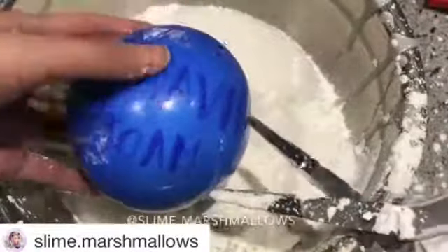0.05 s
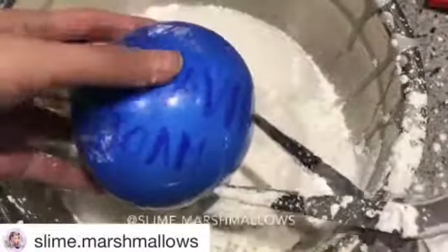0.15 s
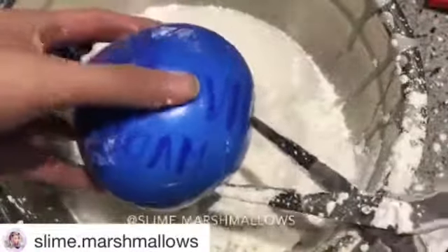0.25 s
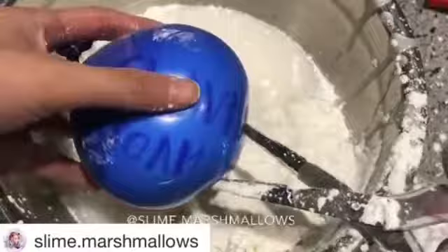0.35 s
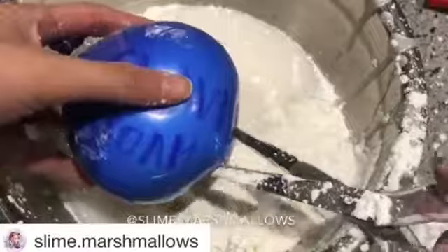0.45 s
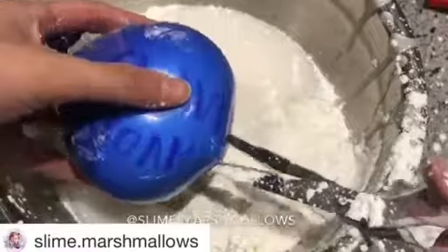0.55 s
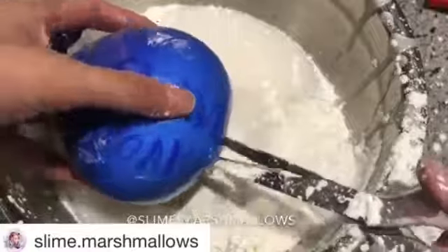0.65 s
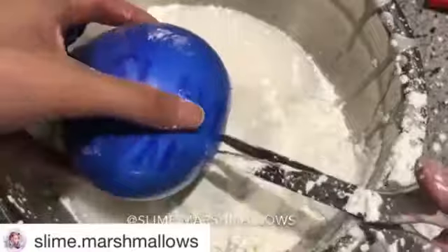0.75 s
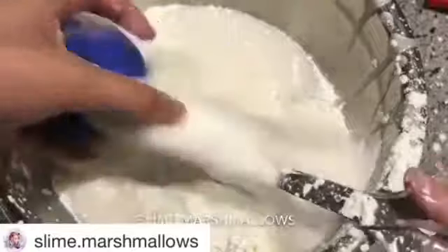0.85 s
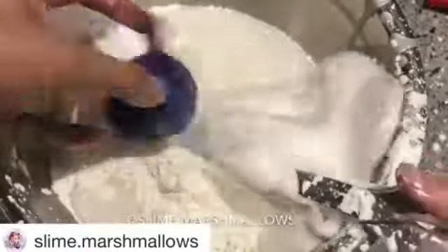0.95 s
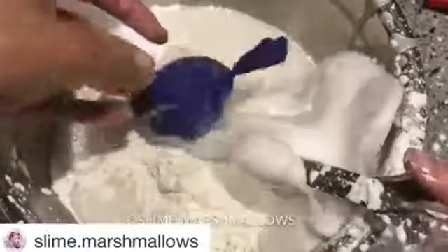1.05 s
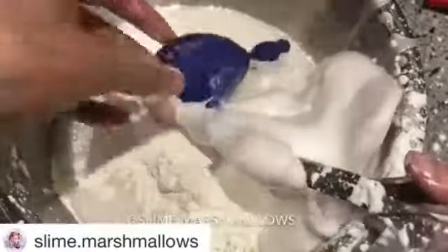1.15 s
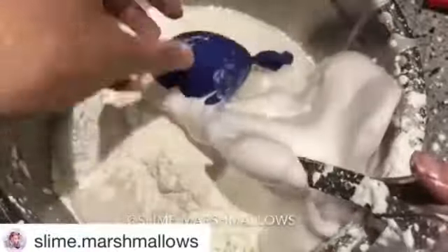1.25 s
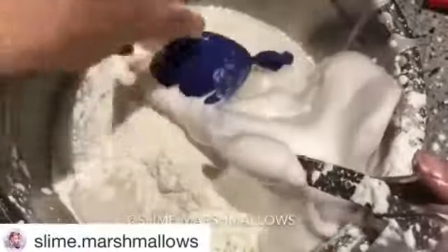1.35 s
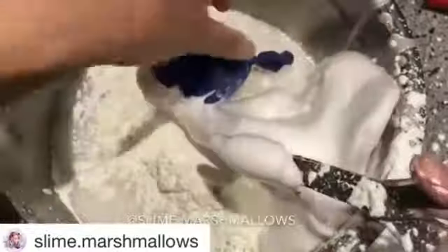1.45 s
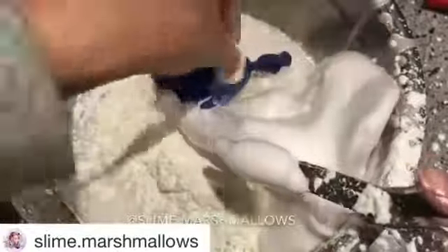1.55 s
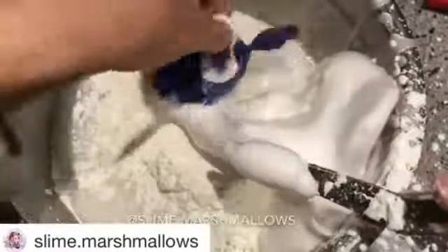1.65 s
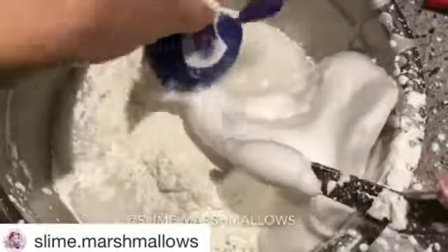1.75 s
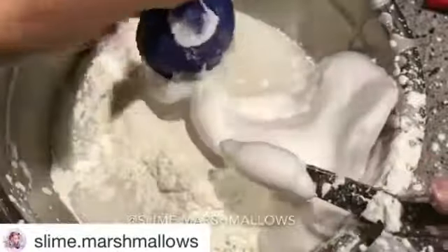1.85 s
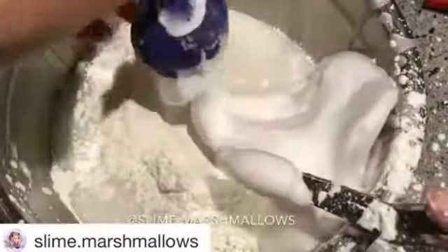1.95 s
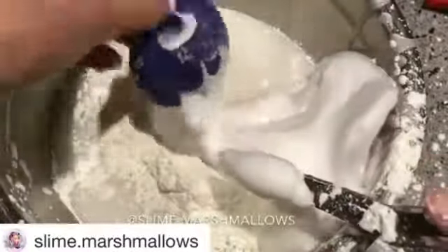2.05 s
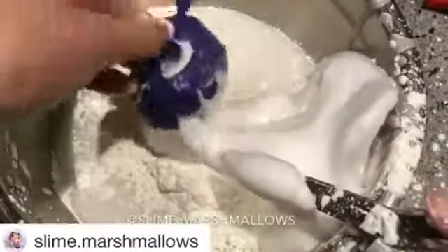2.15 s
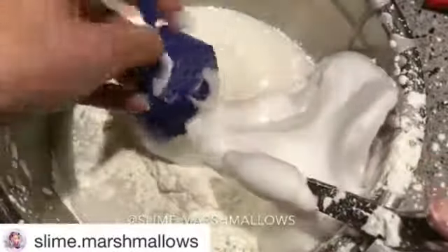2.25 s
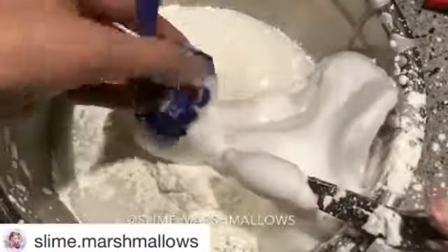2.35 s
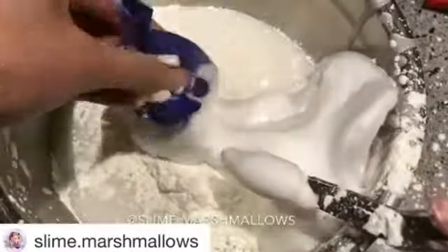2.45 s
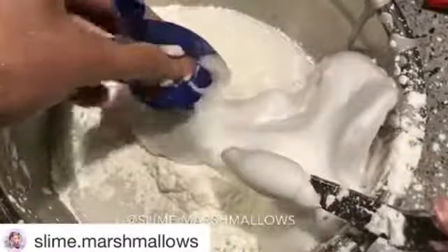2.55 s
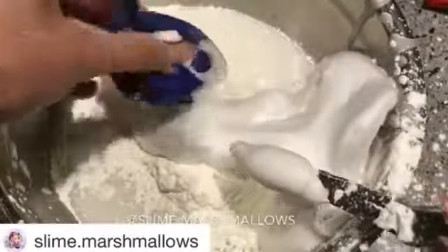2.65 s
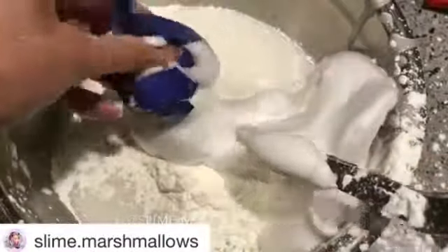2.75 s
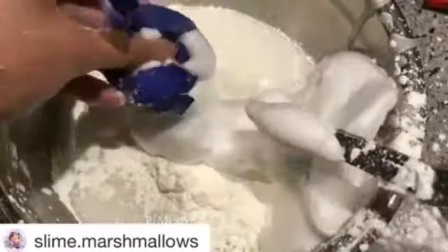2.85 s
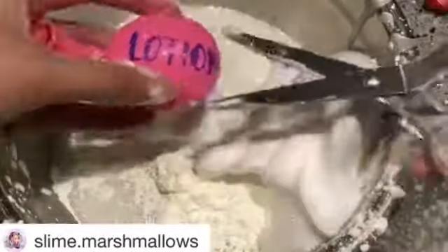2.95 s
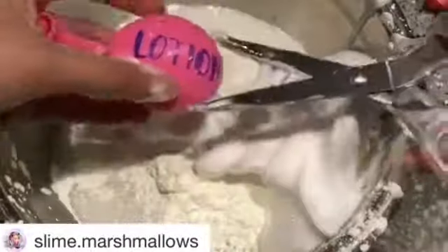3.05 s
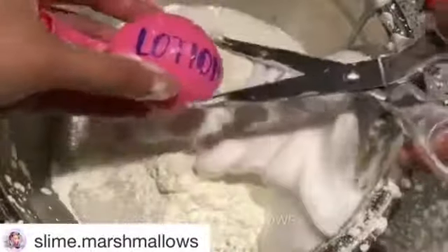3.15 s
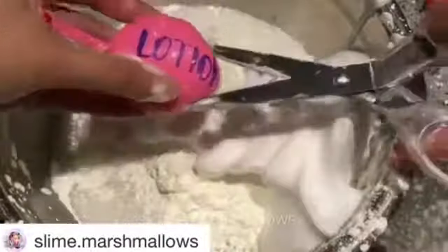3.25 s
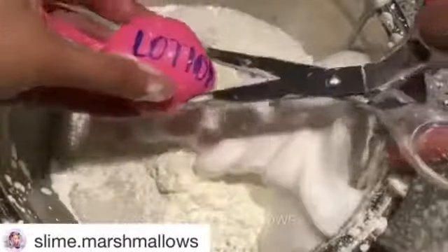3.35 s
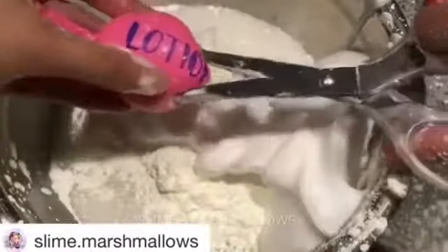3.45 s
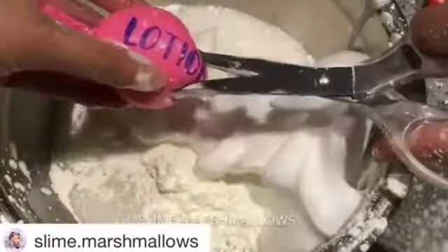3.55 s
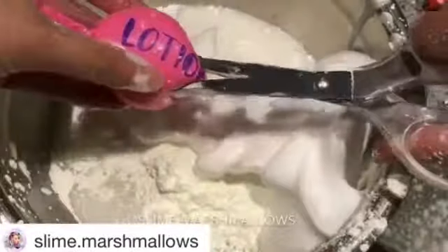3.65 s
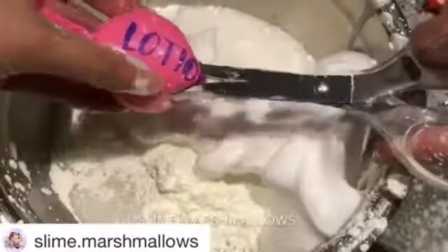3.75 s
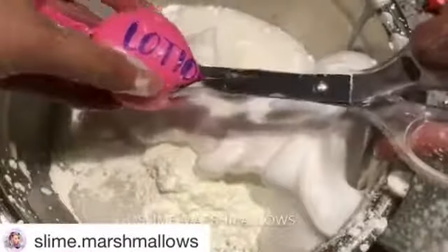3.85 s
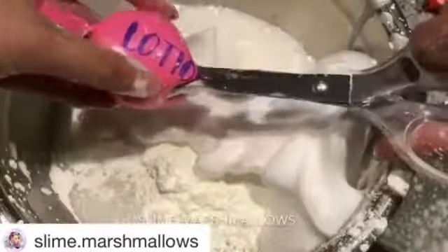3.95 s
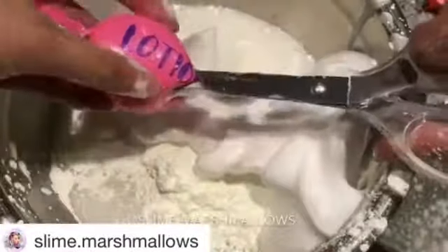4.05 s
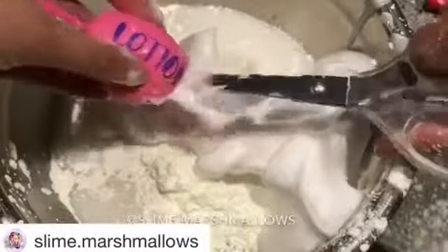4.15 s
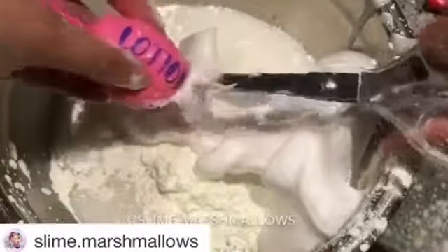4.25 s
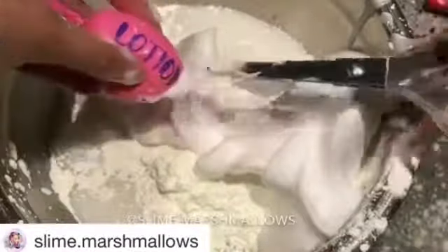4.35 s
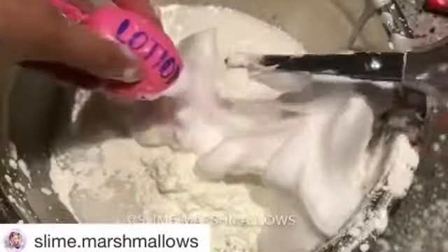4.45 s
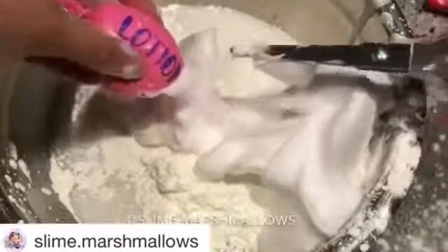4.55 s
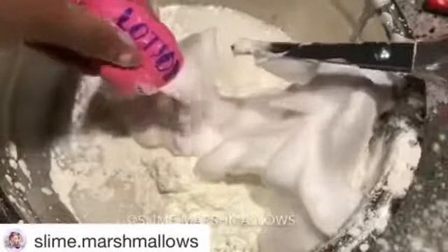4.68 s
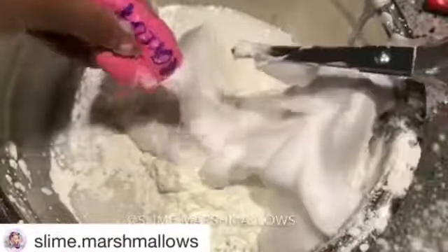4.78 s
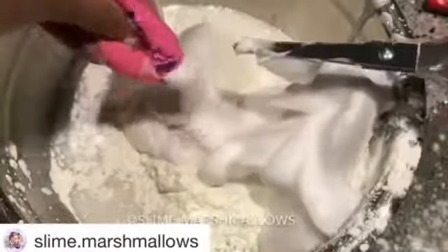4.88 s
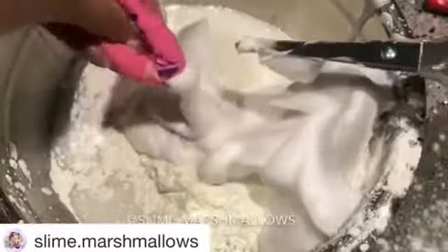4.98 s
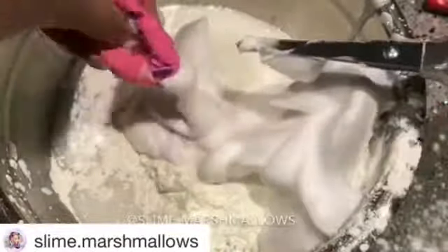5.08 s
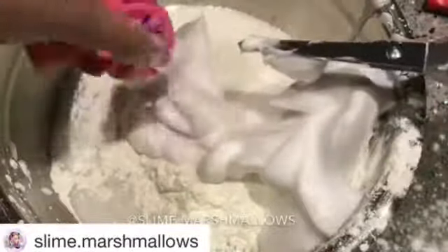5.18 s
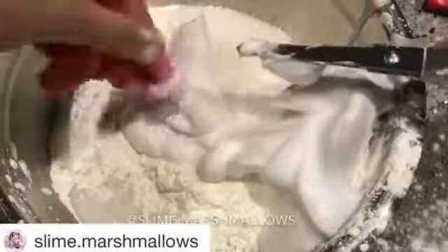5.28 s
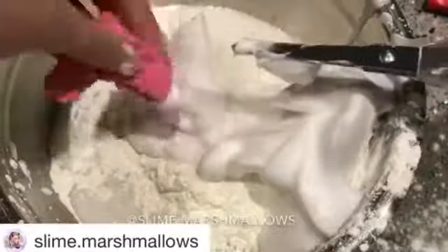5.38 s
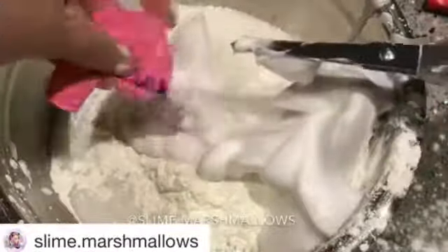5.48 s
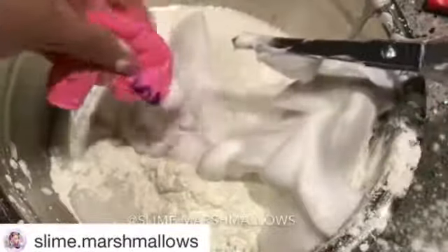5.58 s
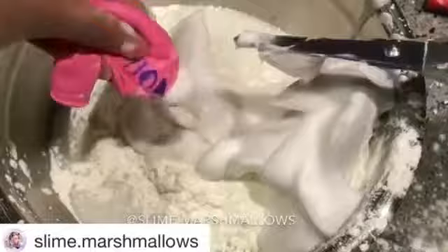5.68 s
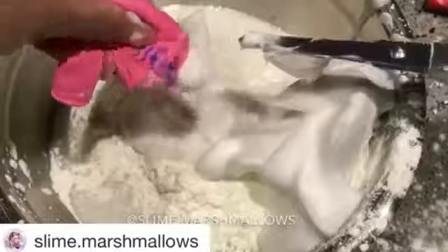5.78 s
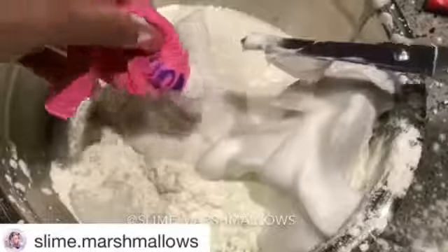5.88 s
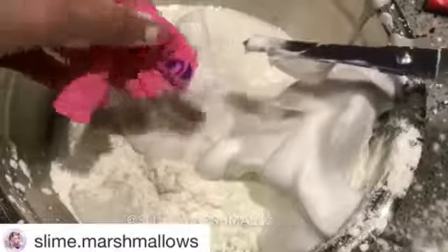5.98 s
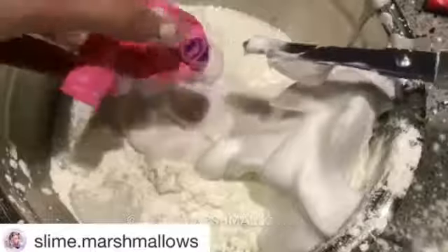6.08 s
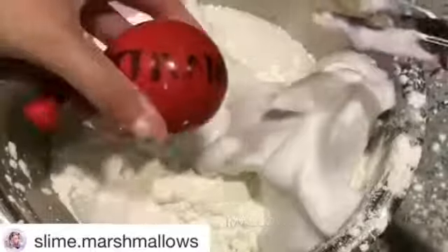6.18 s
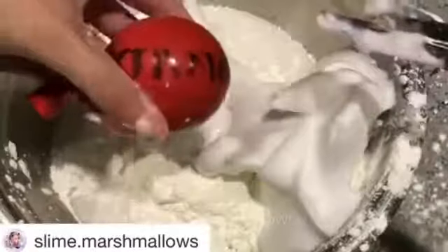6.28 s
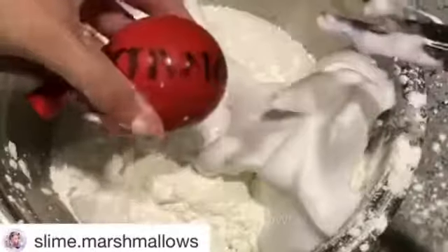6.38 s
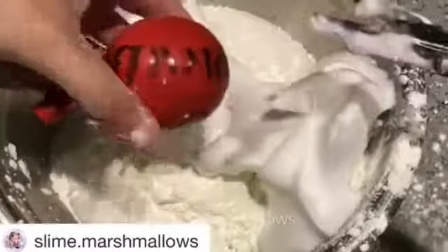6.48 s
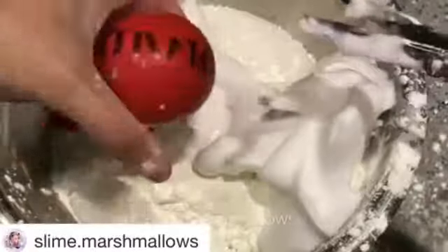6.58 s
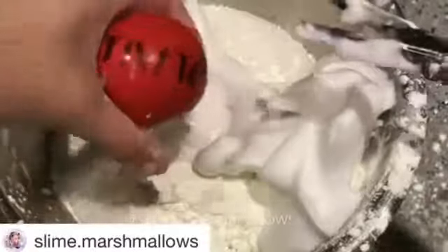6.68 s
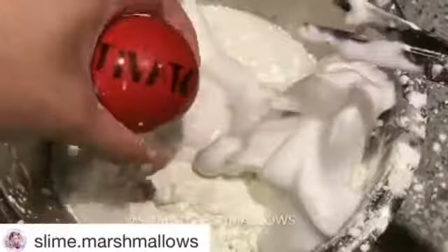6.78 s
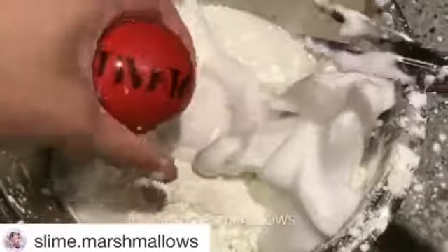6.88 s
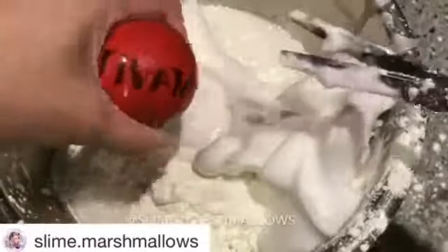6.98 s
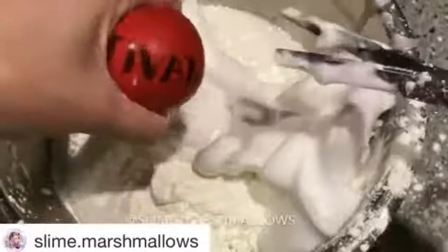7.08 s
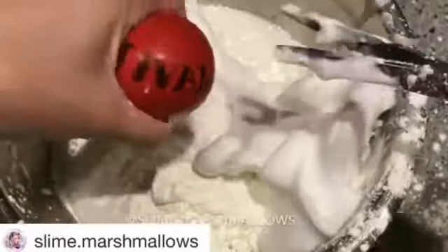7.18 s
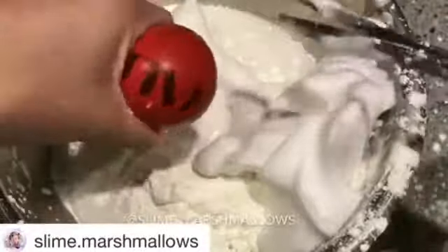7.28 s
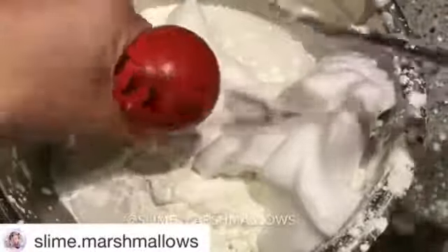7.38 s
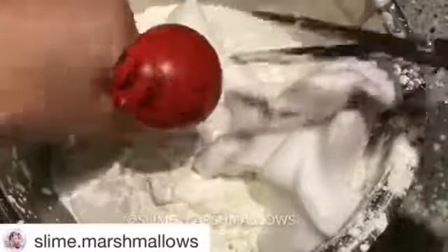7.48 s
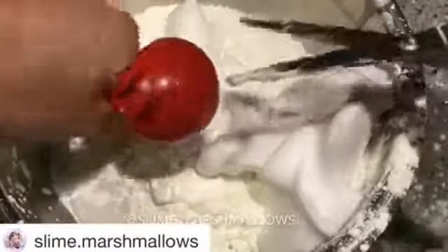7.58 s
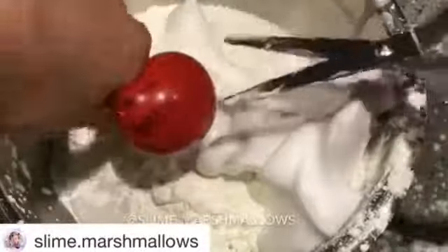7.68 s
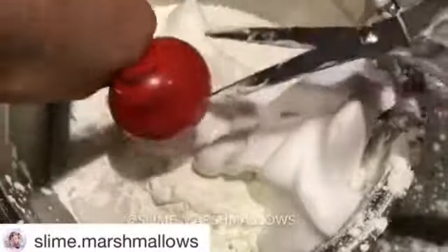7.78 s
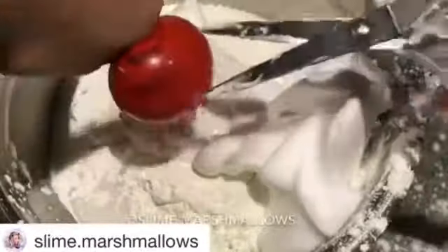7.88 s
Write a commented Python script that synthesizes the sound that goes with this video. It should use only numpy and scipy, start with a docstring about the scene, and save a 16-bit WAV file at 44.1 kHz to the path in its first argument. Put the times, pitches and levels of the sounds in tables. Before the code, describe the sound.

Close-up handling of rubber and fizzing foam over a steady hum, broken by two loud balloon bursts that ring a metal bowl in a small room.

```python
"""A small room, phone microphone close to a steel bowl over which two filled balloons are cut with scissors.
An appliance hums steadily: one wavering tone over filtered noise. Fingers rub rubber and crackle foam in
strokes of noise and tiny pings, with separate clicks and plucks. A noisy hiss and whistle swell before each pop,
plainest before the second. Each skin bursts in quick snaps, each a pressure pulse, a crack and a flutter, that ring
the bowl's decaying tones and the room's echoes; a soft hiss hangs on after."""
import sys
import numpy as np
from scipy import signal
from scipy.fft import rfft, irfft, next_fast_len
from scipy.io import wavfile
from scipy.ndimage import uniform_filter1d

SR = 44100
rng = np.random.default_rng(int(sys.argv[2]) if len(sys.argv) > 2 else 0)


def bounce(signal):
    """Save signal as a 16-bit WAV file at the path given by the first command-line argument."""
    frames = np.transpose(np.atleast_2d(signal))
    limited = np.clip(frames, -1, 1)
    pcm = np.round(limited * 32767).astype(np.int16)
    wavfile.write(sys.argv[1], SR, pcm)


N = 349713  # length in samples


def undb(db):
    """Decibels to amplitude gain."""
    return 10 ** (np.asarray(db) / 20)


def level(x, db):
    """Scale to an rms level in dB."""
    return x * undb(db) / np.sqrt(np.mean(x ** 2))


def fade(t, t60):
    """Exponential decay by 60 dB in t60 seconds."""
    return np.exp(-np.log(1000) * t / t60)


def along(points, hz):
    """Read (Hz, value) points on a log-frequency axis."""
    point_hz, value = np.transpose(points)
    return np.interp(np.log(np.maximum(hz, 1)), np.log(point_hz), value)


def colour(x, points):
    """Causal minimum-phase filter with the given spectrum shape, scaled to unit power gain."""
    size = next_fast_len(2 * len(x), True)
    size += size % 2
    gain = undb(along(points, np.arange(size // 2 + 1) * SR / size))
    # folding the cepstrum onto positive time makes the filter causal
    cepstrum = irfft(np.log(level(gain, 0)))
    cepstrum[1:size // 2] *= 2
    cepstrum[size // 2 + 1:] = 0
    response = np.exp(rfft(cepstrum))
    return irfft(rfft(x, size) * response)[:len(x)]


def band(x, low_hz, high_hz):
    """Band-pass filter, its upper edge kept below half the sample rate."""
    edges = [low_hz, min(high_hz, .47 * SR)]
    return signal.sosfilt(signal.butter(2, edges, "bandpass", fs=SR, output="sos"), x)


def walk(rate):
    """Slow chance: random levels, `rate` per second, slewed; rms 1."""
    hold = int(SR / rate)
    steps = np.repeat(rng.standard_normal(N // hold + 1), hold)
    return level(uniform_filter1d(steps, hold)[:N], 0)


def add(track, s, x):
    """Mix a sound in at time s."""
    i = int(s * SR)
    track[i:i + len(x)] += x[:N - i]


def even_noise(t):
    """Noise with the same energy at every frequency."""
    phases = 2 * np.pi * rng.random(len(t) // 2 + 1)
    return level(irfft(np.exp(1j * phases), len(t)), 0)


def burst(shape, count=6):
    """Noise under an envelope whose spectrum stays smooth, like one short impact."""
    x = rng.standard_normal(len(shape)) * shape
    # alternately flatten the spectrum and press the envelope back on
    for _ in range(count):
        flat = irfft(np.exp(1j * np.angle(rfft(x))), len(x))
        x = flat * np.sqrt(shape / shape.max())
    return level(x, 0) * np.sqrt(np.mean(shape ** 2))


def grains(rate, low_hz, high_hz, t60, spread_db):
    """Tiny bubbles and slips at random moments, each ringing briefly at its own pitch."""
    t = np.arange(SR // 50) / SR
    out = np.zeros(N)
    for when, pitch, size in rng.random((int(rate * N / SR), 3)):
        hz = low_hz * (high_hz / low_hz) ** pitch
        db = spread_db * min(-np.log(1 - size), 3)  # most are small, a few stand out
        ping = np.sin(2 * np.pi * hz * t) * fade(t, t60)
        add(out, when * N / SR, undb(db) * ping)
    return out


def swell(start_s, length_s, attack_s, sag_db_per_s, release_t60):
    """Envelope that rises, holds with a slight sag and is released."""
    t = np.arange(int((length_s + release_t60) * SR)) / SR
    out = np.zeros(N)
    rise = np.minimum(t / attack_s, 1)
    release = fade(np.maximum(t - length_s, 0), release_t60)
    add(out, start_s, rise * undb(-sag_db_per_s * t) * release)
    return out


# Ventilation and hiss behind everything. Each row: frequency in Hz, relative density in dB per Hz.
AIR_COLOUR = [(20, -27), (35, -16), (50, -6.5), (85, -0.5), (180, -2), (228, -8.5), (272, -2), (315, -8),
              (358, -2.5), (440, -13.5), (650, -17), (1500, -22.5), (4000, -28), (14000, -34)]
HUM_HZ, HUM_DB, AIR_DB = 125, -57, -61.5


def appliance():
    """A motor hums on one slightly wavering line over the rush of moving air."""
    phase = 2 * np.pi * np.cumsum(HUM_HZ + 0.25 * walk(1.6)) / SR
    hum = level(np.sin(phase) * undb(.5 * walk(3)), HUM_DB)
    rush = colour(rng.standard_normal(N), AIR_COLOUR) * undb(.5 * walk(4.6))
    return hum + level(rush, AIR_DB)


# How long the room lingers. Each row: frequency in Hz, decay by 60 dB in seconds.
ROOM_DECAY = [(100, .35), (400, 0.55), (800, 0.42), (1600, .52), (3500, 0.48), (8000, 0.66), (14000, .3)]
# Tone of the room's echoes. Each row: frequency in Hz, relative level in dB.
ROOM_TONE = [(60, -4), (250, 1.5), (700, 1.5), (1500, -1), (3000, -1), (6000, -2.5), (14000, -4)]


def room(x, db, delay_s, early_db, early_t60):
    """Dense noise echoes: the worktop and near walls die fast, the room fades at its own rate in each octave."""
    t = np.arange(SR * 3 // 4) / SR
    tail = np.zeros(len(t))
    for hz in 62.5 * 2 ** np.arange(9):
        octave = band(even_noise(t), hz / np.sqrt(2), hz * np.sqrt(2))
        tail += octave * fade(t, along(ROOM_DECAY, hz))
    early = undb(early_db) * even_noise(t) * fade(t, early_t60)
    build_up = np.minimum(t / delay_s, 1) ** 2
    echoes = colour((tail + early) * build_up, ROOM_TONE)
    return undb(db) * signal.fftconvolve(x, echoes)[:N]


# Tones of the steel bowl, damped by its filling.
# Each row: frequency in Hz, relative level in dB, decay by 60 dB in seconds.
BOWL_MODES = [(383, -3.5, 0.33), (467.9, -8, 0.84), (549.3, -11, 0.71), (612, -8, 0.447), (615, -5.5, 0.35),
              (807, -3, 0.26), (1016, -10.5, 0.25), (1160, -7.5, 0.54), (1277, -10.5, .4), (1370, -10, .56),
              (1465.4, -10, .46), (1660, -7, 0.4), (1640, -8.5, .38), (1884, -9.5, .32), (2117, -15, 0.45),
              (2641.5, -16, .45), (2690, -13, 0.51), (3058, -16.5, .25)]


def bowl(x, db):
    """The bowl rings on its decaying modes with whatever sounds inside it."""
    t = np.arange(SR * 3 // 4) / SR
    ring = np.zeros(len(t))
    for hz, mode_db, t60 in BOWL_MODES:
        ring += undb(mode_db) * np.sin(2 * np.pi * hz * t) * fade(t, t60)
    return undb(db) * signal.fftconvolve(x, ring)[:N]


# Tone of rubbed rubber. Each row: frequency in Hz, relative density in dB per Hz.
RUB_TONE = [(300, -28), (700, 0), (1150, -2), (1800, -2.5), (3000, -6), (4500, -4), (8000, -21.5)]
# Tone of fizzing foam. Each row: frequency in Hz, relative density in dB per Hz.
FIZZ_TONE = [(1500, -33), (3500, -4.5), (6500, -4.5), (10500, 0.5), (14000, -3)]
# The hiss left hanging after each pop. Each row: start in seconds, length in seconds, level of its fizz in dB.
HISS_AFTER_POPS = [(1.041, 0.335, -62.5), (4.308, 0.32, -63)]


def after_hiss(body_db):
    """A soft, even hiss of two noise colours hangs on for a third of a second after each pop."""
    fizz = colour(rng.standard_normal(N), FIZZ_TONE)
    body = undb(body_db) * colour(rng.standard_normal(N), RUB_TONE)
    loudness = np.zeros(N)
    for s, length_s, db in HISS_AFTER_POPS:
        loudness += undb(db) * swell(s, length_s, attack_s=.01, sag_db_per_s=4, release_t60=0.055)
    return (fizz + body) * loudness


# Strokes of the fingers that rub the skin and squeeze out foam, close to the microphone.
# Each row: start in seconds, length in seconds, rubbing level in dB, fizz level in dB.
FINGER_STROKES = [(0.188, 0.065, -75, -73), (0.292, .11, -64, -63.5), (0.71, 0.068, -70, -80),
                  (0.82, 0.11, -64, -67.5), (1.729, 0.026, -64, -56.5), (1.77, .19, -70, -71.5),
                  (1.953, 0.18, -71, -74), (2.205, 0.066, -66.5, -62), (2.29, 0.16, -72, -67.5),
                  (2.431, 0.11, -63.5, -61.5), (2.587, 0.19, -65.5, -62.5), (2.78, 0.13, -73.5, -70.5),
                  (2.889, 0.091, -68, -64), (2.977, 0.17, -72, -69.5), (3.62, 0.028, -77, -84.5),
                  (3.76, 0.28, -75.5, -87), (4.86, 0.33, -90, -68), (5.255, 0.077, -81.5, -62.5),
                  (5.363, 0.23, -84, -72), (5.583, 0.13, -81, -61), (5.749, 0.095, -76, -64),
                  (5.92, 0.31, -72, -65), (5.98, .06, -80, -60.5), (6.89, 0.055, -80, -75),
                  (7.167, 0.048, -69.5, -63.5), (7.30, .13, -75, -70), (7.513, 0.087, -79, -64.5),
                  (7.609, .04, -76, -60.5), (7.66, 0.11, -80, -70)]
STROKE_ATTACK_S, STROKE_RELEASE_T60_S, STROKE_SAG_DB_PER_S = 0.017, 0.13, 22.5
HOLD_RUB_DB, HOLD_FIZZ_DB = -81.5, -80.5  # the hand merely holding a balloon


def handling(slip_db, bubble_db, tick_db, uneven_db):
    """Fingers rub the skin in small slips; tiny foam bubbles burst in a soft hiss, some with a tick."""
    # powers of holding and of every stroke add up
    rub_power, fizz_power = undb(HOLD_RUB_DB) ** 2, undb(HOLD_FIZZ_DB) ** 2
    for s, length_s, rub_db, fizz_db in FINGER_STROKES:
        pressure = swell(s, length_s, STROKE_ATTACK_S, STROKE_SAG_DB_PER_S, STROKE_RELEASE_T60_S)
        rub_power = rub_power + (undb(rub_db) * pressure) ** 2
        fizz_power = fizz_power + (undb(fizz_db) * pressure) ** 2
    rub = colour(rng.standard_normal(N), RUB_TONE)
    hiss = colour(rng.standard_normal(N), FIZZ_TONE)
    slips = level(grains(rate=280, low_hz=947.3, high_hz=3210, t60=0.011, spread_db=2), slip_db)
    bubbles = level(grains(rate=900, low_hz=5500, high_hz=13900, t60=0.0071, spread_db=2.0), bubble_db)
    ticks = level(grains(rate=50, low_hz=7008, high_hz=12984, t60=.004, spread_db=3.5), tick_db)
    rubbing = np.sqrt(rub_power) * level(rub + slips, 0)
    fizzing = np.sqrt(fizz_power) * level(hiss + bubbles + ticks, 0)
    grip = undb(uneven_db * walk(110))
    return grip * (rubbing + fizzing)


# Wet clicks of foam, rubber and scissors.
# Each row: start in seconds, approximate peak in dB, centre frequency in Hz.
WET_CLICKS = [(0.83, -47.5, 7100), (.983, -49, 5000), (1.0172, -42, 4500), (3.0526, -34.5, 9010),
              (3.063, -38, 6000), (3.066, -32, 6700), (3.137, -44.5, 9910), (3.147, -46, 9900),
              (3.28, -52, 5440), (3.336, -49.5, 6020), (4.2961, -21, 7000), (4.4882, -46.5, 9100),
              (4.8492, -40.5, 12520), (5.0866, -45.5, 7860), (5.2785, -48.5, 11900), (5.3693, -45, 12000),
              (5.7281, -43.5, 8940), (5.8175, -41, 6570), (5.839, -40.5, 9240), (5.901, -47.5, 9040),
              (5.9442, -41.5, 10000), (6.0097, -38, 8050), (6.0228, -31, 9400), (6.035, -41, 6350),
              (6.157, -46, 11970), (6.2142, -47.5, 11000), (6.647, -45, 7600), (7.2107, -40, 7460),
              (7.5667, -44, 12000), (7.5813, -39.5, 7860)]
CLICK_T60_S = 0.013


def clicks(spread, crest_db, ring_db, ring_t60):
    """Sticky surfaces part with a short, bright click of noise; three tiny bubbles ping with it."""
    t = np.arange(SR // 10) / SR
    out = np.zeros(N)
    shape = fade(t, CLICK_T60_S)
    for s, db, hz in WET_CLICKS:
        edge = band(burst(shape, count=4), hz / spread, hz * 1.8)
        edge = band(edge, hz / spread, 18000)
        pitches = hz * 2 ** rng.uniform(-.5, .3, 3)
        pings = sum(np.sin(2 * np.pi * f * t) for f in pitches) * fade(t, ring_t60)
        # crest_db allows for the peak standing above the rms
        click = level(level(edge, 0) + level(pings, ring_db), db - crest_db)
        add(out, s, click * np.sqrt(np.mean(shape ** 2)))
    return out


# Rubber slipping and plucked by fingers or blade. Each row: start in seconds, peak in dB, pitch in Hz.
RUBBER_PLUCKS = [(0.829, -36, 860), (0.839, -42, 224), (1.019, -42, 885.7), (1.024, -38, 318),
                 (1.609, -53, 2994), (1.642, -55, 3020), (1.714, -53.5, 3000), (1.72, -50.5, 940),
                 (2.171, -55, 1220), (2.251, -52.5, 1402), (2.297, -53.5, 1300), (2.353, -53, 1480),
                 (2.392, -54, 1420), (2.471, -40, 1264), (2.615, -47, 1090), (2.638, -45, 1180),
                 (3.065, -39, 3033), (7.209, -46, 1830), (7.332, -48.5, 1600)]
PLUCK_T60_S, PLUCK_CYCLES = .009, 10  # a twang lasts a fixed time plus a few cycles


def plucks(rise_s, scrape_db):
    """Stretched rubber slips free and twangs as a short decaying tone, with a dry scrape of noise."""
    t = np.arange(SR // 10) / SR
    out = np.zeros(N)
    for s, db, hz in RUBBER_PLUCKS:
        rise = (1 - np.exp(-t / rise_s)) ** 2
        swing = fade(t, PLUCK_T60_S + PLUCK_CYCLES / hz) * rise
        scrape = band(burst(swing), hz / np.sqrt(2), hz * np.sqrt(3))
        tone = np.sin(2 * np.pi * hz * t) * swing
        twang = level(tone, 0) + level(scrape, scrape_db)
        add(out, s, undb(db) * twang / np.abs(twang).max())
    return out


# Tone of the tearing hiss. Each row: frequency in Hz, relative density in dB per Hz.
TEAR_TONE = [(300, -26.5), (1500, -17.5), (3000, -10.5), (5000, -5.5), (6100, 2), (7500, -6), (9500, -7),
             (11800, -2), (14000, -14)]
# The cuts opening before each pop. Each row: pricked at, widens at and bursts at in seconds,
# hiss level in dB at the burst, whistle level in dB at the burst.
CUTS = [(1.018, 1.018, 1.039, -52, -68), (4.185, 4.254, 4.303, -40, -45)]
HISS_GROWTH_DB_PER_S, WHISTLE_GROWTH_DB_PER_S = 210, 190
WHISTLE_HZ, WHISTLE_WIDTH_HZ, WHISTLE_ATTACK_S = 6050, 850, .04


def tear(uneven_db, seep_db):
    """Foam and air whistle and hiss through the prick, unevenly and ever louder, until the skin bursts."""
    t = np.arange(N) / SR
    hiss = colour(rng.standard_normal(N), TEAR_TONE)
    low_hz, high_hz = WHISTLE_HZ - WHISTLE_WIDTH_HZ / 2, WHISTLE_HZ + WHISTLE_WIDTH_HZ / 2
    whistle = level(band(rng.standard_normal(N), low_hz, high_hz), 0)
    out = np.zeros(N)
    for prick_s, widen_s, burst_s, hiss_db, whistle_db in CUTS:
        leaking = (t > prick_s) & (t < burst_s)
        now = t[leaking]
        left_s = burst_s - now
        opening_db = np.where(now < widen_s, seep_db, 0)  # the narrow prick only lets the hiss seep
        hiss_gain = undb(hiss_db + opening_db - HISS_GROWTH_DB_PER_S * left_s)
        attack = np.minimum((now - prick_s) / WHISTLE_ATTACK_S, 1)
        whistle_gain = attack * undb(whistle_db - WHISTLE_GROWTH_DB_PER_S * left_s)
        out[leaking] += hiss[leaking] * hiss_gain + whistle[leaking] * whistle_gain
    return out * undb(uneven_db * walk(350))


# Snaps of the two bursting skins, blue then pink, right at the microphone.
# Each row: start in seconds, pressure pulse level in dB, pulse pitch in Hz, flutter level in dB,
# flutter length in seconds, crack level in dB.
BLUE_BALLOON_SNAPS = [(1.0402, -1.5, 1402, -9.5, 0.0097, -10.5), (1.0512, -6, 625.8, -13.5, 0.008, -23),
                      (1.0539, -5.5, 735, -14.5, 0.0047, -19), (1.0580, -9.5, 1143, -18.5, 0.0071, -19.5)]
PINK_BALLOON_SNAPS = [(4.3033, 0, 1884, -13, 0.0069, -14.5), (4.3079, -5.5, 916.6, -15.5, .0055, -20)]
# Tone of each flapping skin. Each row: frequency in Hz, relative density in dB per Hz.
BLUE_SKIN_TONE = [(35, -30.5), (70, -15.5), (115, -7), (180, -7.5), (270, -5.5), (400, -11.5), (670, 3.5),
                  (960, -7.5), (1130, -2), (1580, -4.5), (1900, -14.5), (2700, -12), (4400, -18),
                  (5400, -27), (14000, -24.5)]
PINK_SKIN_TONE = [(50, -32), (180, -13.5), (290, -26.5), (395, -6), (520, -14), (700, -3), (840, 6),
                  (1200, -7), (1500, 0), (2200, -3), (3100, -28.5), (5900, -13.5), (8000, -22.5),
                  (14000, -20)]


def balloon(snaps, skin, crack_t60, low_hz, crack_hz):
    """Each snap is a pressure pulse of a few cycles, a bright crack and the flutter of slack rubber."""
    t = np.arange(SR // 10) / SR
    out = np.zeros(N)
    for s, pulse_db, hz, flutter_db, flutter_s, crack_db in snaps:
        swing = -np.sin(2 * np.pi * hz * t) * fade(t, 7 / hz)  # 60 dB down after seven cycles
        pulse = band(swing, low_hz, 5900)  # a small balloon radiates little bass
        flutter = colour(burst(np.exp(-(t / flutter_s) ** 2), count=3), skin)
        crack = band(burst(fade(t, crack_t60), count=2), crack_hz, 14000)
        add(out, s, undb(pulse_db) * pulse + undb(flutter_db) * flutter + undb(crack_db) * crack)
    return out


PINK_SPILL_DB = -2  # the smaller balloon stirs the bowl and the room less


def scene():
    """Pops, tears, plucks and clicks ring the bowl and the room; handling, late hiss and hum stay dry."""
    blue = balloon(BLUE_BALLOON_SNAPS, BLUE_SKIN_TONE, crack_t60=0.0081, low_hz=270.0, crack_hz=3700)
    pink = balloon(PINK_BALLOON_SNAPS, PINK_SKIN_TONE, crack_t60=0.025, low_hz=580, crack_hz=4600)
    near = blue + tear(uneven_db=1.9, seep_db=-9)
    near += plucks(rise_s=.001, scrape_db=0.5)
    near += clicks(spread=2.1, crest_db=6.0, ring_db=-5.0, ring_t60=0.0068)
    spill = near + undb(PINK_SPILL_DB) * pink
    ringing = bowl(spill, db=-68.5) + room(spill, db=-53.0, delay_s=0.0061, early_db=7, early_t60=0.2)
    hands = handling(slip_db=-6, bubble_db=-6.5, tick_db=-10, uneven_db=1.84)
    return (near + pink + ringing + hands + after_hiss(body_db=-1) + appliance())[None]


# Brief dips of the whole level. Each row: centre in seconds, half width in seconds.
LEVEL_DIPS = [(3.104, 0.032), (6.299, 0.032)]


def record(dry):
    """The level dips twice, the loudest peaks are rounded and the top is cut above 14 kHz."""
    t = np.arange(N) / SR
    gain = np.prod([np.clip(np.abs(t - s) / half_s, .04, 1) for s, half_s in LEVEL_DIPS], axis=0)
    rounded = np.tanh(0.86 * dry * gain) / 0.79
    return signal.sosfilt(signal.ellip(8, .2, 70, 14000, fs=SR, output="sos"), rounded)


dry = scene()
out = record(dry)
bounce(out)
```